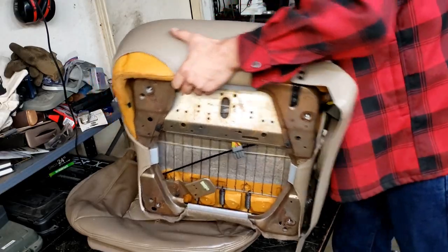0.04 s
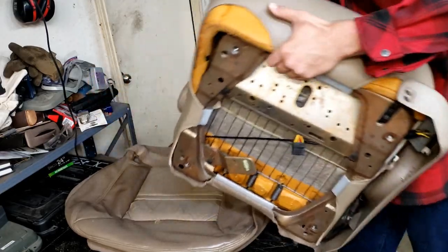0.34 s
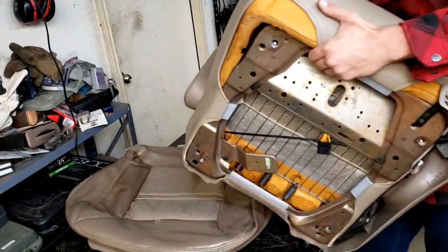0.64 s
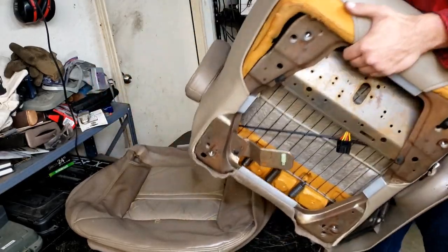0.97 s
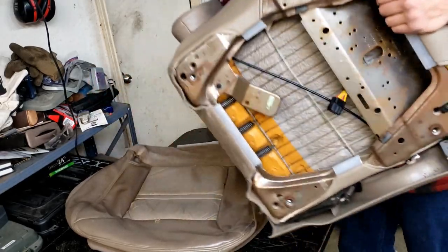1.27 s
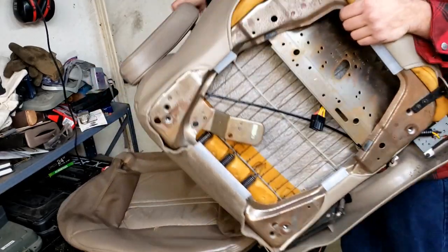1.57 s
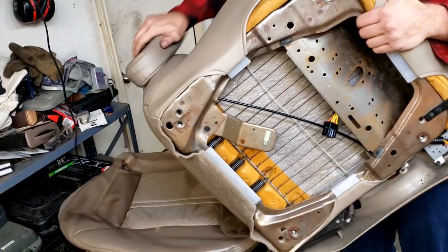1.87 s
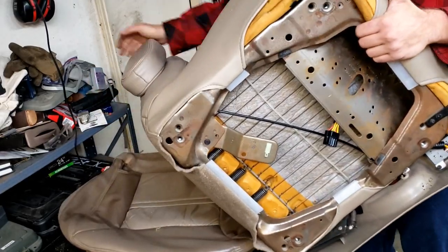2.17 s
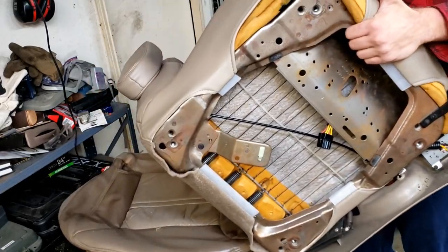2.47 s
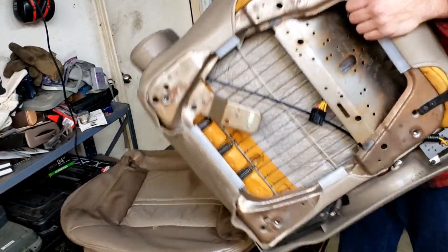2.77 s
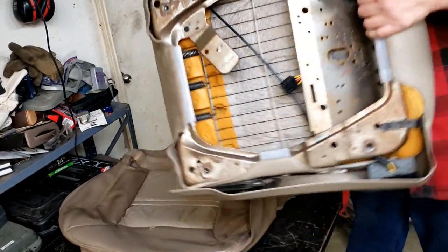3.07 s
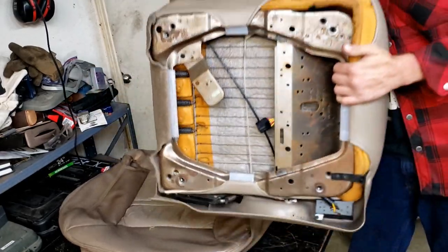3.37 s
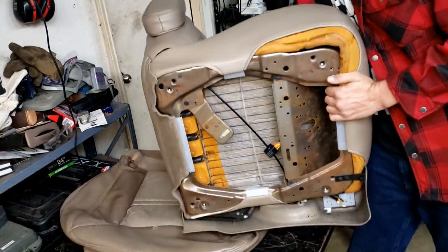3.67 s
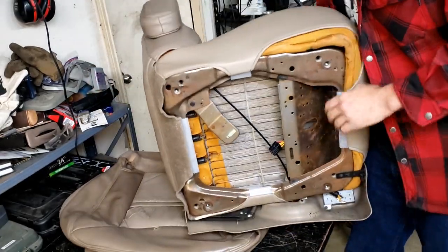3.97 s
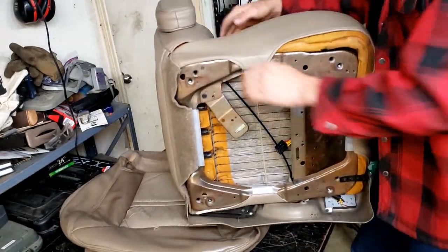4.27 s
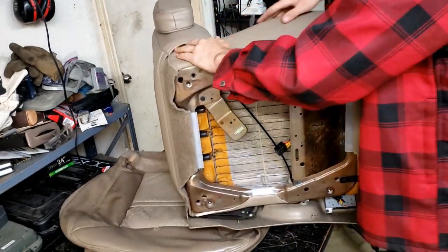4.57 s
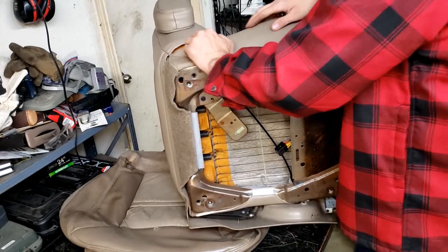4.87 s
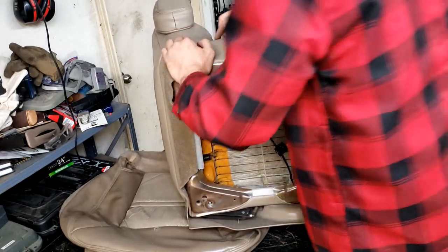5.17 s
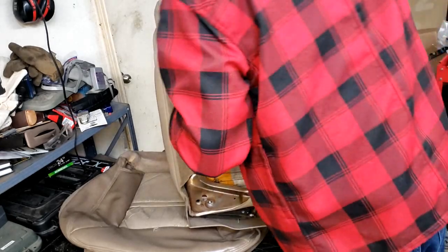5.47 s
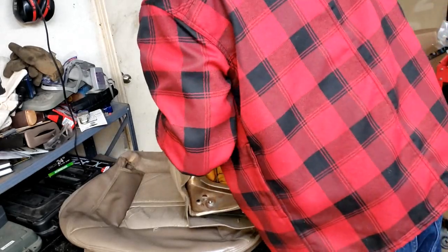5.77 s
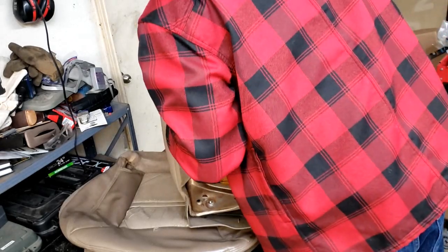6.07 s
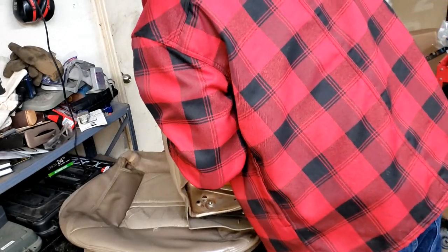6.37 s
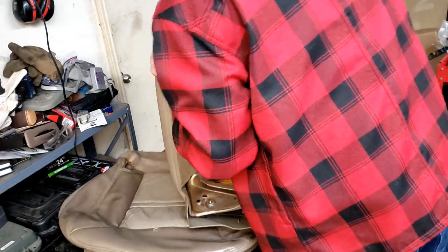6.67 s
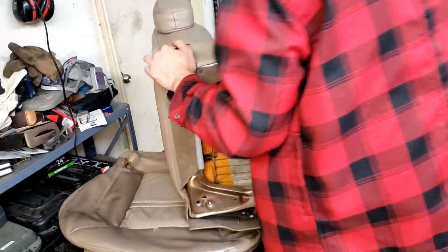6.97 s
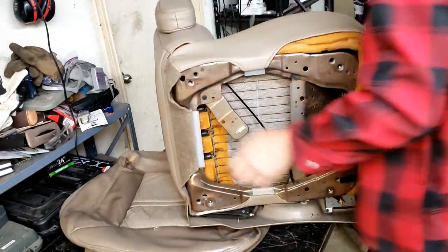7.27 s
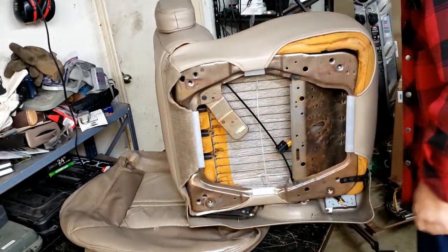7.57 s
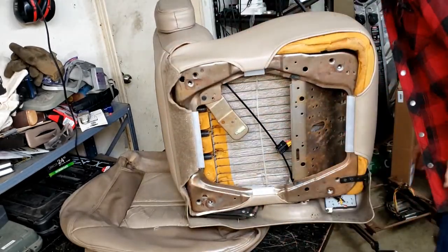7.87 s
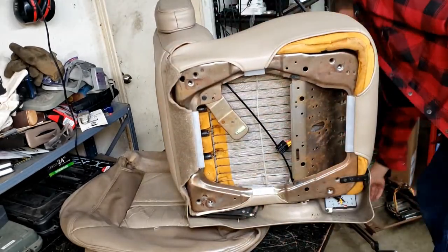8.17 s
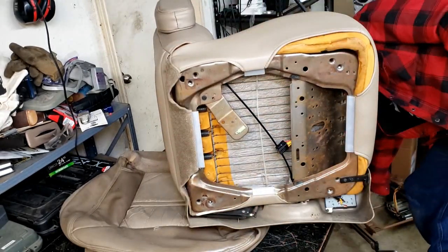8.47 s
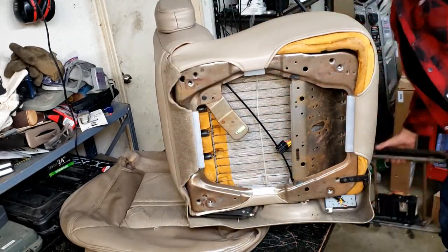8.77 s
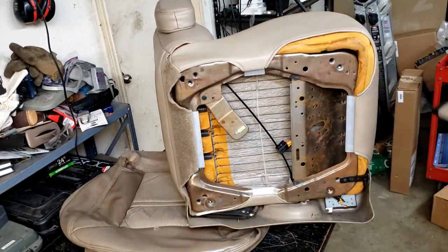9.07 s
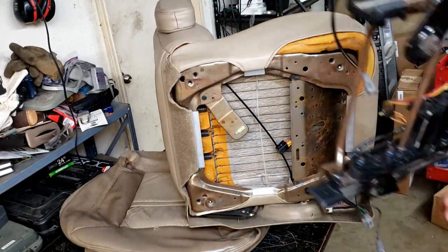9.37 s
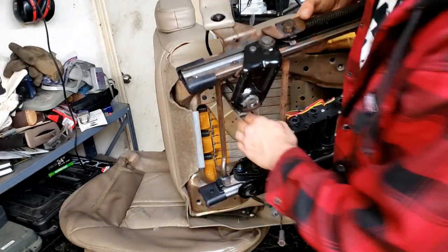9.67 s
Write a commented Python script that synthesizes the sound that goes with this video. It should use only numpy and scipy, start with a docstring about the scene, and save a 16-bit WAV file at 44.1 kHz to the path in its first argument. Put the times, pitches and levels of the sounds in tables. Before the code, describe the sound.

Close by in a garage, someone wrestles a padded car seat into position: irregular hollow bumps and clacks, rubbing leather with a few thin squeaks, swishing cloth and snapping clips. After this eases off, two shoe steps fall on a concrete floor. A very brief silence is broken by sharp metallic rattles and clinks from the seat rails, with two soft low thuds among them. Faint room air and hum lie underneath.

```python
"""A car seat is tipped, dragged and set down on its cover in a garage. Stick-slip friction shakes its frame and
makes leather scrape and squeak, while a sleeve rustles; impacts excite the modes of the padded steel pan, and
small catches snap. Two footfalls follow, a brief silence, then a quick, crowded run of rattles and clinks from
the steel seat rails, with two soft low thuds, like footfalls, among them. Reverberation adds dense tails, over
room air and faint mains hum."""
import sys
import numpy as np
from scipy import signal
from scipy.fft import rfft, irfft, next_fast_len
from scipy.io import wavfile
from scipy.ndimage import uniform_filter1d

SR = 44100
rng = np.random.default_rng(int(sys.argv[2]) if len(sys.argv) > 2 else 0)


def put_to_file(sound):
    """Save the sound as 16-bit audio at rate SR, in the file named by the first command-line argument."""
    columns = np.atleast_2d(sound).T  # one column per channel
    safe = np.clip(columns, -1, 1)
    whole_steps = np.round(safe * 32767)
    wavfile.write(sys.argv[1], SR, whole_steps.astype(np.int16))


N = 437913
TIME = np.arange(N) / SR
ROOM_T60_S = 0.4114

# shoves of the seat on its cover: t/s, length/s, swell/dB, frame rumble/dB, leather scrape/dB
SEAT_DRAGS = [(0, 0.0688, 9.5, -41, -50), (0.092, 0.2565, 0, -47, -49.5), (0.399, 0.107, 3, -44.5, -55),
              (0.612, 0.1358, -5.5, -38.5, -45), (0.77, 0.137, -3.5, -51, -54.5),
              (0.884, 0.0547, 4, -41, -44.5), (0.979, 0.145, 5.5, -46.5, -56.5),
              (1.128, 0.407, 10, -55.5, -50.5), (1.398, 0.3354, 1, -41.5, -45.5),
              (1.747, 0.2155, -17, -41, -52.5), (1.982, 0.0696, -10, -40.5, -47.5),
              (2.134, 0.1944, -1, -53, -59), (2.457, 0.148, -3, -53.5, -60.5),
              (2.543, 0.338, 0, -48.5, -51), (2.888, 0.326, 12.5, -48.5, -54.5),
              (3.313, 0.313, -3, -46, -53.5), (3.591, 0.039, -3, -36, -42), (3.639, 0.1912, -0.5, -40, -47),
              (3.776, 0.555, -20, -67, -55.5), (4.17, 0.24, -11, -58.5, -58.5),
              (4.512, 0.125, -3, -56, -76), (4.645, 0.0746, 4.5, -48.5, -53),
              (4.776, 0.344, 2.5, -65.5, -67), (5.146, 0.1646, 3.5, -49, -53),
              (5.334, 0.336, -5.5, -57.5, -63.5), (5.65, 0.2053, -3, -53, -59),
              (6.046, 0.191, -8, -60.5, -67), (6.569, 0.0756, -9, -63.5, -67.5),
              (7.052, 0.084, -7.5, -61, -77.5)]
# cloth brushing the upholstery: t/s, length/s, swell/dB, hiss/dB, extra brightness/dB
CLOTH_SWISHES = [(0.175, 0.132, 10, -48.5, 2), (0.404, 0.2065, 15, -49.5, 2.5),
                 (0.647, 0.182, 6.5, -60.5, 6.5), (0.848, 0.1765, -3, -51.5, 6), (1.063, 0.314, 10, -54, 7),
                 (1.334, 0.143, 10, -53, 5.5), (1.782, 0.143, 12.5, -47, 3), (2.66, 0.216, -14, -54.5, -3),
                 (2.884, 0.158, 4, -60, 3), (3.562, 0.0517, 16.5, -45, -4),
                 (4.335, 0.249, -2.5, -55.5, 4.5), (4.612, 0.242, -10, -48, -2),
                 (4.82, 0.235, 0.5, -65.5, 9), (5.011, 0.0802, 8.5, -44.5, -0.5),
                 (5.18, 0.334, 10, -56, -2.5), (5.445, 0.102, 11.5, -49, -6),
                 (6.986, 0.0976, 6.5, -63.5, 1.5), (7.212, 0.087, 10, -57, 2.5),
                 (8.026, 0.926, 0, -66, 8.5)]
# blows on the seat: t/s, thump/dB, body/dB, ring centre/Hz, clack/dB, clack top/Hz, tick/dB, rise/s
SEAT_BLOWS = [(0.209, -45, -42.5, 220, -66.5, 4000, -42, 0.00116),
              (0.487, -66, -31, 229, -43.5, 1500, -55.5, 0.0056),
              (0.589, -43, -50, 250, -28.5, 5000, -36.5, 0.00197),
              (0.596, -39.5, -27.5, 258, -30, 3480, -49.5, 0.00125),
              (0.699, -41.5, -31, 197, -51.5, 1500, -51, 0.0045),
              (0.902, -70, -26, 377, -32, 1000, -62.5, 0.0225),
              (1.29, -65, -29, 270, -38.5, 1500, -41, 0.0088),
              (1.31, -44, -24.5, 246, -46, 1500, -41, 0.00104),
              (1.316, -53.5, -23, 306, -30, 1640, -34.5, 0.0022),
              (1.948, -34.5, -27.5, 255, -24, 2460, -33, 0.00103),
              (1.966, -32, -34, 220, -51.5, 2200, -53, 0.0049),
              (2.155, -51.5, -34.5, 283, -51, 900, -58, 0.00589),
              (2.179, -60.5, -37, 267, -55, 1500, -51.5, 0.00193),
              (2.263, -57.5, -42.5, 421, -67, 800, -64, 0.0011),
              (2.317, -58, -42.5, 235, -65.5, 805, -67.5, 0.0029),
              (2.873, -55, -40, 420, -50.5, 4000, -60, 0.00043),
              (3.156, -56.5, -38.5, 300, -44, 4000, -68, 0.00385),
              (3.212, -48, -44.5, 278, -46, 4000, -54, 0.00135),
              (3.472, -49.5, -42, 420, -46.5, 3000, -70, 0.001),
              (3.566, -42, -38.5, 265, -40, 3500, -50.5, 0.00038),
              (3.66, -38.5, -28.5, 530, -69.5, 1300, -62.5, 0.0234),
              (4.103, -64, -27, 352, -25.5, 1824, -39, 0.00116),
              (4.12, -49.5, -32, 338, -34, 1000, -41.5, 0.00112),
              (4.283, -53, -65.5, 200, -77, 1000, -77, 0.015),
              (4.515, -66, -51, 277, -49, 2500, -47, 0.0055),
              (5.047, -52, -38, 234.4, -49.5, 3000, -59.5, 0.006),
              (5.262, -64.5, -31, 314, -39.5, 2500, -46, 0.00137),
              (5.278, -49.5, -34.5, 298, -36.5, 2520, -38.5, 0.00233),
              (5.732, -83, -53, 300, -47.5, 3050, -60.5, .001),
              (6.573, -85.5, -69, 278, -63, 3000, -61.5, 0.0027),
              (6.803, -66.5, -43, 246.2, -63.5, 900, -87.5, 0.0095),
              (7.054, -64.5, -50, 280, -55.5, 900, -76, 0.00484)]
# clips, wires and catches snapping: t/s, level/dB, centre/Hz
CATCH_SNAPS = [(0.21, -29.5, 5000), (0.434, -42, 4174), (1.115, -42.5, 5500), (1.773, -46, 3000),
               (2.586, -43, 1500), (3.346, -49.5, 2200), (3.36, -47.5, 2800), (3.476, -45, 4000),
               (5.396, -49, 2000), (5.689, -45.5, 3500), (9.133, -34.5, 8000)]
# leather slipping on leather: t/s, length/s, start pitch/Hz, end pitch/Hz, breadth/Hz, level/dB
LEATHER_SQUEAKS = [(1.612, 0.123, 2970, 3352, 600, -52.5), (3.801, .22, 2105, 1941, 55, -58),
                   (4.484, 0.19, 1710, 1635, 50, -61), (5.166, 0.082, 1350, 1526, 301, -56),
                   (6.85, 0.26, 2008, 2456, 70, -76.5), (7.188, 0.153, 382, 420, 35, -61.5)]
# shoe contacts on concrete: t/s, rise/s, thud/dB, grit/dB, T60/s
SHOE_CONTACTS = [(7.495, 0.0366, -45, -33, 0.246), (7.528, 0.0094, -39, -33, 0.319),
                 (7.555, 0.0059, -44.5, -42.5, 0.429), (7.857, 0.00167, -28.5, -42.5, 0.345),
                 (7.877, 0.0016, -53.5, -39.5, 0.39)]
# rail rattles and two soft low thuds (at 8.899 and 9.187 s): t/s, length/s, thud/dB, thud centre/Hz,
# clank/dB, clank top/Hz, chatter/dB, chatter centre/Hz
BURSTS = [(8.605, 0.0434, -40, 100, -35, 2440, -25.5, 3860),
          (8.645, 0.0506, -52, 116.3, -46, 2200, -40.5, 3300),
          (8.705, 0.0398, -66, 180.7, -43.5, 2230, -42, 4000),
          (8.763, 0.0582, -96.5, 199.6, -62, 2000, -44.5, 5170),
          (8.899, 0.0373, -50.5, 245, -68, 1500, -69.5, 3000),
          (8.939, 0.0702, -79.5, 343.1, -60.5, 2230, -55, 3770),
          (8.973, 0.0146, -61.5, 300, -56, 2200, -31.5, 15000),
          (9.025, 0.075, -63.5, 160, -52.5, 2360, -38, 4790),
          (9.134, 0.02114, -66, 200, -51.5, 2300, -31, 8730),
          (9.187, 0.0926, -64, 236, -97, 2000, -87, 5900),
          (9.443, 0.0537, -61, 298, -56.5, 2190, -55, 6000),
          (9.57, 0.0527, -45.5, 387, -43, 1690, -51, 5960),
          (9.616, 0.0287, -44.5, 134, -45, 1850, -46.5, 5400),
          (9.632, 0.0308, -51, 298, -40.5, 1635, -48.5, 4500),
          (9.66, 0.034, -57.5, 190, -58.5, 1700, -59.5, 4600),
          (9.739, 0.0558, -84, 344, -56, 1940, -60, 5700),
          (9.836, 0.00278, -56.5, 417, -33, 2700, -35.5, 11100),
          (9.838, 0.03065, -47, 423, -38.5, 2456, -46, 14400)]
# steel parts ringing: t/s, contact length/s, level/dB, centre/Hz, spread/octaves, T60/s
RAIL_CLINKS = [(8.61, 0.043, -29.5, 3800, 0.138, 0.036), (8.69, 0.048, -36.5, 1900, 0.59, 0.0155),
               (8.773, 0.042, -44, 3680, 1.42, 0.06), (8.864, 0.0367, -52, 2300, 0.106, 0.127),
               (8.975, 0.0036, -30, 5810, 0.65, 0.45), (8.975, 0.0066, -41, 1560, 0.21, 0.05),
               (9.133, 0.007, -35.5, 6530, 0.186, 0.2), (9.136, 0.0566, -66, 3440, 0.065, 0.23),
               (9.443, 0.0411, -45, 2304, 0.058, 0.303)]

# normal modes: f/Hz, level/dB, T60/s
PAN_MODES = [(201.7, 1.5, 0.14), (233.7, 1.5, 0.186), (298.64, 1.5, 0.14), (339.65, 1, 0.16),
             (377.95, 1, 0.21), (466.25, 4.5, 0.13), (563.1, -1, .22), (689.6, -7.5, 0.24),
             (792.6, -3.5, 0.18), (1028.8, -1.5, 0.073), (1170, -8.5, 0.26), (1291, -3.5, 0.14),
             (1849, -6.5, 0.15), (1947, -22.5, .22), (2189, -9.5, 0.34)]  # padded steel pan
BOUNCE_MODES = [(78.98, 5, 0.37), (96, 3, 0.16), (123.2, 2, 0.3)]  # whole seat on its support
# normal modes of a seat rail: f/Hz, level/dB
RAIL_MODES = [(1470, 15.5), (1540, 12.5), (1895, -10.5), (2290, 4), (2890, 6), (3272, -1.5), (3450, -12.5),
              (3667, -5), (3870, -1.5), (3965, -6.5), (4226, -11), (5200, 9.5), (6370, 3), (8050, 1.5)]
# mains hum: f/Hz, level/dB
MAINS_HARMONICS = [(60, -77.5), (120, -75.5), (240, -83.5)]

# spectral envelopes: f/Hz, level/dB
FRAME_SPECTRUM = [(30, -26), (70, -18.5), (105, -9.5), (150, -1.5), (230, 2), (320, -2), (410, -2.5),
                  (480, -2), (620, -5.5), (820, -9.5), (1050, -14.5), (2000, -37)]  # shuddering frame
LEATHER_SPECTRUM = [(450, 2.5), (850, 0), (1300, -0.5), (2000, -3), (3300, -9.5), (4500, -22), (8000, -40)]  # scraping leather
CLOTH_SPECTRUM = [(2200, -0.5), (4200, -1), (6000, -2), (10000, -5), (16000, -7)]  # rubbing fibres
AIR_SPECTRUM = [(25, -14.5), (60, -5), (150, -6.5), (400, -8), (700, -15), (1100, -23.5), (1600, -9),
                (2300, -10.5), (3500, -19), (5000, -22.5), (7000, -15), (10000, -23), (16000, -21.5)]  # still garage air
CLACK_SPECTRUM = [(300, -7.5), (520, -6), (680, 1), (800, -3), (930, -5.5), (1320, -9.5), (1750, -6.5),
                  (2100, -12), (2600, -12), (4500, -13), (8000, -33.5)]  # hard contact on the seat
SOLE_SPECTRUM = [(30, -34.5), (65, 6), (130, 6), (260, 11.5), (370, -36), (580, -26.5), (800, -5.5),
                 (1100, -7), (2000, -31)]  # heel thud
GRIT_SPECTRUM = [(300, 2.5), (700, -3.5), (1100, -8.5), (2200, -2), (4000, -4.5), (7000, -7.5),
                 (16000, -17.5)]  # grit under a sole
LEFT_MINUS_RIGHT = [(60, 2), (1500, 3), (4400, 3.5), (8000, 2.5), (15000, 5.5)]  # level difference between the channels
MIC_RESPONSE = [(28, -10), (65, 1.5), (135, -1.5), (172, -4.5), (220, -2), (6000, -0.5), (7400, 2),
                (8400, -9), (10500, -3.5), (13000, 0.5), (15500, 1.5)]  # microphone at its place in the room


def undb(db):
    """Amplitude ratio of a level in decibels."""
    return 10 ** (np.asarray(db) / 20)


def unit(x):
    """Normalisation to rms 1."""
    return x / np.sqrt(np.mean(x ** 2) + 1e-20)


def fade(t, t60):
    """Exponential decay of 60 dB in t60."""
    return np.exp(-np.log(1000) * t / max(t60, 1e-3))


def add(out, start_s, x):
    """Superposition of x on out from a given time."""
    i = int(start_s * SR)
    out[:, i:i + x.shape[-1]] += x[..., :N - i]


def colour(x, envelope):
    """Zero-phase filtering by an envelope of f/Hz, level/dB."""
    hz, db = np.transpose(envelope)
    f = np.fft.rfftfreq(x.shape[-1], 1 / SR)
    return irfft(rfft(x) * undb(np.interp(np.log(f + 1), np.log(hz), db)), x.shape[-1])


def between(x, low_hz, high_hz, order=6):
    """Band-pass filtering to rms 1; order sets the upper slope."""
    f = np.fft.rfftfreq(x.shape[-1], 1 / SR) + 1
    band = 1 / np.sqrt((1 + (low_hz / f) ** 6) * (1 + (f / high_hz) ** order))
    return unit(irfft(rfft(x) * band, x.shape[-1]))


def cut(x, hz, kind):
    """Butterworth low-pass or high-pass filtering."""
    return signal.sosfilt(signal.butter(4, hz, kind, fs=SR, output="sos"), x)


def wander(n, rate):
    """Smooth random modulation of spread near 1, from rate draws a second."""
    hold = int(SR / rate)
    stairs = np.repeat(rng.standard_normal(n // hold + 1), hold)
    return 1.3 * uniform_filter1d(uniform_filter1d(stairs, hold), hold)[:n]


def diffuse(n, apart_hz=650):
    """Diffuse-field noise at two close points: coherence falls with frequency."""
    mid, side = rfft(rng.standard_normal((2, n)))
    f = np.fft.rfftfreq(n, 1 / SR)
    width = np.hypot(f, 90) / np.hypot(f, apart_hz)
    return unit(irfft((mid + np.array([[1], [-1]]) * width * side) / np.sqrt(1 + width ** 2), n))


def slips(n, rate, spread_db):
    """A Poisson train of impulses of random size and sign, at a mean rate per second."""
    size = undb(spread_db * np.minimum(rng.exponential(size=n), 4))
    return (rng.random(n) < rate / SR) * size * rng.choice([-1, 1], n)


def grains(n, rate, spread_db, t60):
    """Incoherent summation: many tiny decaying contacts add in energy."""
    pole = fade(2 / SR, t60)
    energy = signal.lfilter([1], [1, -pole], slips(n, rate, spread_db) ** 2)
    return diffuse(n) * np.sqrt(energy)


def ring(modes, t, apart_hz=1200):
    """Damped modes vary with the contact point; high ones reach the two channels out of phase."""
    chance = rng.standard_normal((len(modes), 3))
    out = np.zeros((2, len(t)))
    for (hz, db, t60), (gain, detune, skew) in zip(modes, chance):
        offset = np.array([[1], [-1]]) * skew * min(hz / apart_hz, 1)
        phase = 2 * np.pi * hz * (1 + 0.015 * detune) * t + offset
        out += undb(db + 2 * gain) * np.sin(phase) * fade(t, t60)
    return out


def strike(x, db):
    """Normalisation of an impact to an rms level over its first 20 ms."""
    return x * undb(db) / np.sqrt(np.mean(x[..., :SR // 50] ** 2))


def friction(envelope, rate, spread_db, grain_t60, shift_db):
    """Stick-slip noise, whose spectrum shifts as the contact patch moves."""
    centres_hz = np.geomspace(100, 16000, num=16)
    n = next_fast_len(N, real=True)
    f = np.fft.rfftfreq(n, 1 / SR)
    spectrum = rfft(colour(grains(n, rate, spread_db, grain_t60), envelope))
    bands = (irfft(spectrum * np.interp(f, centres_hz, one), n)[:, :N] for one in np.eye(16))
    return unit(sum(band * undb(shift_db * wander(N, rate=33)) for band in bands))


def stroke(start_s, length, swell_db, min_rise_s=0.0284, rise_share=0.229, t60=0.384):
    """Envelope of one rub: onset, swell or slackening, then reverberant decay."""
    t = np.maximum(TIME - start_s, 0)
    held = undb(swell_db * (np.minimum(t / length, 1) - .5))
    rise = np.sin(np.pi / 2 * np.minimum(t / max(min_rise_s, rise_share * length), 1)) ** 2
    return rise * held * fade(np.clip(t - length, 0, 2), t60)


def frame_rumble(power, lurch_db=2.92, pan_db=-5):
    """Forced vibration: friction shakes the frame, which drives the resonances of the pan."""
    lurches = undb(lurch_db * wander(N, rate=55))  # the seat catches and gives
    shudder = friction(FRAME_SPECTRUM, rate=740, spread_db=1, grain_t60=0.045, shift_db=3.02)
    rumble = shudder * np.sqrt(power) * lurches
    pan = ring(PAN_MODES, TIME[:SR // 4])
    drone = signal.fftconvolve(rumble.mean(axis=0)[None], pan, axes=1)[:, :N]
    return rumble + undb(pan_db) * np.std(rumble) * unit(drone)


def leather_scrape(power):
    """Sliding friction: leather advances in a stream of tiny slips."""
    scrape = friction(LEATHER_SPECTRUM, rate=550, spread_db=-1, grain_t60=0.069, shift_db=2)
    return scrape * np.sqrt(power)


def cloth_hiss(low_power, high_power, crossover_hz=8000, crease_db=-12):
    """Friction between fibres radiates broadband noise, and creases flick over."""
    fibres = friction(CLOTH_SPECTRUM, rate=830, spread_db=3, grain_t60=0.3, shift_db=0.67)
    creases = colour(grains(N, rate=110, spread_db=4, t60=0.006), CLOTH_SPECTRUM)
    rustle = unit(fibres + undb(crease_db) * unit(creases))
    dull = signal.sosfiltfilt(signal.butter(3, crossover_hz, fs=SR, output="sos"), rustle)
    return dull * np.sqrt(low_power) + (rustle - dull) * np.sqrt(high_power)


def sliding():
    """Independent rubs add in power, driving the rumble, scrape and hiss of the moving seat."""
    frame, leather, cloth, sheen = np.zeros((4, N))
    for start_s, length, swell_db, rumble_db, scrape_db in SEAT_DRAGS:
        drag = stroke(start_s, length, swell_db)
        frame += (drag * undb(rumble_db)) ** 2
        leather += (drag * undb(scrape_db)) ** 2
    for start_s, length, swell_db, hiss_db, bright_db in CLOTH_SWISHES:
        swish = stroke(start_s, length, swell_db) * undb(hiss_db)
        cloth += swish ** 2
        sheen += (swish * undb(bright_db)) ** 2
    cloth_scrape = cloth * undb(-26) ** 2  # cloth also scrapes a little
    leather_hiss = leather * undb(-5) ** 2  # leather also hisses a little
    return (frame_rumble(frame) + leather_scrape(leather + cloth_scrape)
            + cloth_hiss(cloth + leather_hiss, sheen + leather_hiss * undb(-2) ** 2))


def garage(air_db=-69):
    """Ambient field: diffuse air noise and the harmonics of mains hum."""
    hum = sum(undb(db) * np.sqrt(2) * np.sin(2 * np.pi * (hz * TIME + rng.random()))
              for hz, db in MAINS_HARMONICS)
    return undb(air_db) * unit(colour(diffuse(N), AIR_SPECTRUM)) + hum


def knocks(crack_t60=0.023, db_per_octave=15):
    """Impacts bounce the seat and excite the pan's modes; foam slows the rise and dulls the clack."""
    out, t = np.zeros((2, N)), TIME[:SR // 2]
    tail, crack = fade(t, ROOM_T60_S), fade(t, crack_t60)
    direct = 1 + undb(-3) * fade(t, 0.014)  # the first swing stands out before the foam damps it
    for start_s, thump_db, body_db, ring_hz, clack_db, clack_top_hz, tick_db, rise_s in SEAT_BLOWS:
        # a blow favours the modes near its ring centre
        favour = lambda hz: -db_per_octave * abs(np.log2(hz / ring_hz))
        room = unit(colour(diffuse(len(t)), [(hz, db + favour(hz) / 2) for hz, db in FRAME_SPECTRUM]))
        room *= tail * (1 - np.exp(-t / 0.0023))
        pan = ring([(hz, db + favour(hz), t60) for hz, db, t60 in PAN_MODES], t)
        pan = cut(pan, 170, "high")  # thin steel hardly radiates below its first mode
        body = (strike(pan, 0) + undb(-9) * room) * direct
        bounce = ring(BOUNCE_MODES, t) * (1 - np.exp(-t / 0.0034))
        # a hard contact cracks and also wakes the upper modes of the pan
        contact = colour(diffuse(len(t)), CLACK_SPECTRUM) * (crack + undb(-9) * tail)
        steel = cut(ring(PAN_MODES, t), 620, "high")
        clack = cut(strike(contact, 0) + strike(steel, -4), clack_top_hz, "low") * direct
        tick = colour(diffuse(len(t)), CLOTH_SPECTRUM) * (crack + undb(-10) * tail)
        blow = (strike(bounce, thump_db) + strike(body, body_db)
                + strike(clack, clack_db) + strike(tick, tick_db))
        add(out, start_s, blow * np.minimum(t / rise_s, 1))
    return out


def snaps(crack_t60=0.0091, tail_db=-19):
    """A small hard part slips and radiates a transient, followed by faint reverberation."""
    out, t = np.zeros((2, N)), TIME[:SR // 4]
    decay = fade(t, crack_t60) + undb(tail_db) * fade(t, ROOM_T60_S)
    for start_s, db, centre_hz in CATCH_SNAPS:
        tick = between(diffuse(len(t)), centre_hz / 2, centre_hz * 2)
        add(out, start_s, undb(db) * tick * decay)
    return out


def squeaks(waver=0.011):
    """Stick-slip oscillation of leather: a band of noise around one unsteady, gliding pitch."""
    out = np.zeros((2, N))
    for start_s, length, start_hz, end_hz, breadth_hz, db in LEATHER_SQUEAKS:
        n = int(length * SR)
        hz = np.linspace(start_hz, end_hz, n) * (1 + waver * wander(n, rate=420))
        tone = np.sin(2 * np.pi * np.cumsum(hz) / SR)
        rasp = between(rng.standard_normal((2, n)), 0.86, breadth_hz, order=3)
        add(out, start_s, undb(db) * unit(rasp * tone * signal.windows.tukey(n)))
    return out


def footfalls():
    """Heel impact and the friction of grit, heard mostly as reverberation from the walls."""
    out, t = np.zeros((2, N)), TIME[:SR // 2]
    for start_s, rise_s, thud_db, grit_db, t60 in SHOE_CONTACTS:
        thud = undb(thud_db) * unit(colour(diffuse(len(t)), SOLE_SPECTRUM))
        grit = undb(grit_db) * unit(colour(diffuse(len(t)), GRIT_SPECTRUM))
        add(out, start_s, (thud + grit) * np.minimum(t / rise_s, 1) * fade(t, t60))
    return out


def rattles_and_thuds(reach_octaves=0.904, rise_share=0.12, sag_db=5, tail_db=-27, tail_t60=0.59):
    """Dense collisions: rail brackets clank and loose parts chatter; two bursts are soft low thuds."""
    out, t = np.zeros((2, N)), TIME[:SR // 4]
    reach = 2 ** reach_octaves
    for start_s, length, thud_db, thud_hz, clank_db, clank_top_hz, chatter_db, chatter_hz in BURSTS:
        contacts = grains(len(t), rate=6300, spread_db=-8.5, t60=0.0115)
        thud = undb(thud_db) * between(contacts, thud_hz / reach, thud_hz * reach)
        clank = undb(clank_db) * between(contacts, 620, clank_top_hz, order=10)
        chatter = undb(chatter_db) * between(contacts, chatter_hz / reach, chatter_hz * reach)
        push = np.minimum(t / (rise_share * length), 1) * undb(-sag_db * np.minimum(t / length, 1))
        after = np.maximum(t - length, 0)
        stop = fade(after, length) + undb(tail_db) * fade(after, tail_t60)  # short bursts stop faster
        add(out, start_s, (thud + clank + chatter) * push * stop)
    return out


def clinks(bounce_rate=1500, buzz_share=0.0057, held_db=-23, rise_share=0.14, bracket_db=-11):
    """Quick bounces excite the modes of rail and brackets, which ring until the rail is held."""
    out, t = np.zeros((2, N)), TIME[:SR // 4]
    for start_s, length, db, centre_hz, spread, t60 in RAIL_CLINKS:
        bracket_hz = np.exp(rng.uniform(np.log(1300), np.log(12000), size=36))
        hz, mode_db = np.transpose(RAIL_MODES + [(f, bracket_db) for f in bracket_hz])
        # the contact point selects the modes; loose joints make their pitch buzz
        weight = undb(mode_db) * np.exp(-.5 * (np.log2(hz / centre_hz) / spread) ** 2)
        pitch = hz[:, None] * (1 + buzz_share * np.array([wander(len(t), rate=700) for _ in hz]))
        phase = rng.uniform(0, 2 * np.pi, (len(hz), 1))
        stereo_phase = np.array([[[1]], [[-1]]]) * rng.uniform(-1.39, 1, (len(hz), 1))
        partials = np.sin(2 * np.pi * np.cumsum(pitch, axis=1) / SR + phase + stereo_phase)
        response = weight @ partials * fade(t, t60)
        bounces = slips(len(t), bounce_rate, spread_db=1.5) * (t < length) * np.exp(-t / length)
        bounces[0] = 2  # first impact
        ringing = cut(signal.fftconvolve(response, bounces[None], axes=1)[:, :len(t)], 1100, "high")
        ringing *= np.minimum(t / (rise_share * length), 1)  # a long contact starts gently
        contact_rms = np.sqrt(np.mean(ringing[:, t < length] ** 2))
        held = np.maximum(fade(np.maximum(t - length, 0), 0.038), undb(held_db))
        add(out, start_s, undb(db) * ringing / contact_rms * held)
    return out


def scene():
    """Superposition of all sources; a level difference places them a little to the left."""
    seat = sliding() + squeaks() + knocks() + snaps()
    left, right = seat + footfalls() + rattles_and_thuds() + clinks() + garage()
    return np.array([colour(left, [(hz, db / 2) for hz, db in LEFT_MINUS_RIGHT]),
                     colour(right, [(hz, -db / 2) for hz, db in LEFT_MINUS_RIGHT])])


def record(dry, silence_s=(8.544, 8.566), top_hz=16000):
    """Filtering makes dips near 170 Hz and above 8 kHz and cuts the top; the sound drops out briefly."""
    sounding = (TIME < silence_s[0]) | (TIME > silence_s[1])
    gate = uniform_filter1d(sounding.astype(float), size=64)
    low_pass = signal.ellip(10, .2, 70, top_hz, fs=SR, output="sos")
    return signal.sosfilt(low_pass, colour(dry, MIC_RESPONSE) * gate)


dry = scene()
out = record(dry)
put_to_file(out)
```